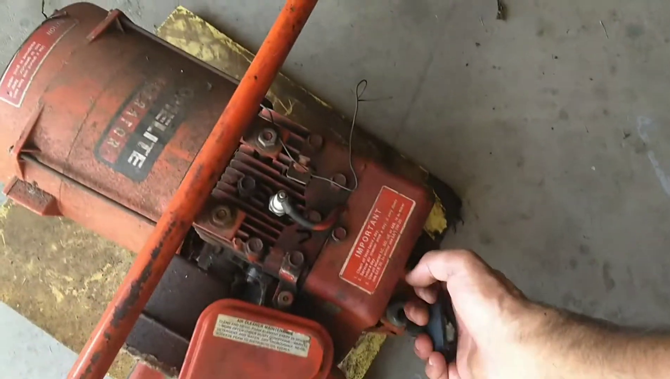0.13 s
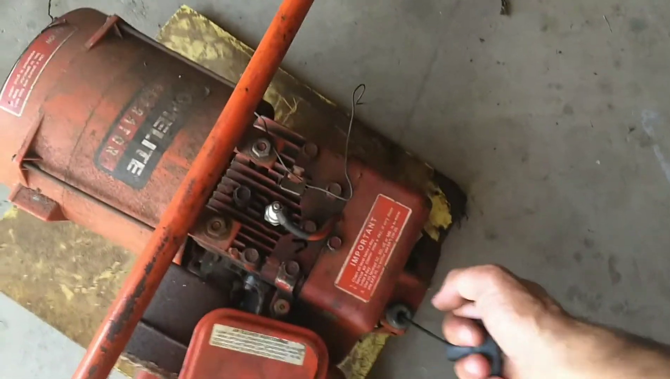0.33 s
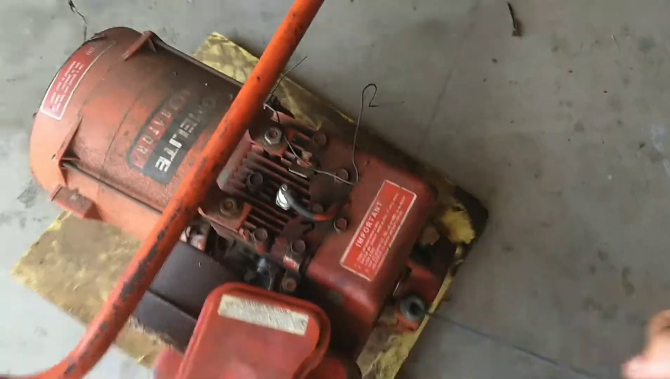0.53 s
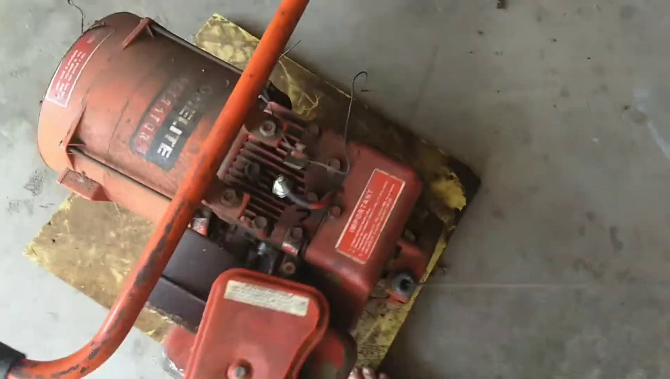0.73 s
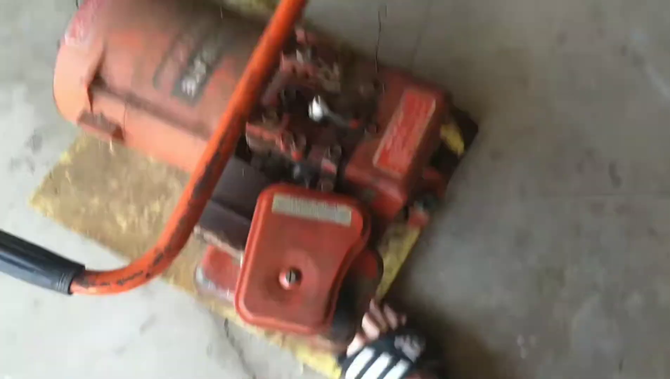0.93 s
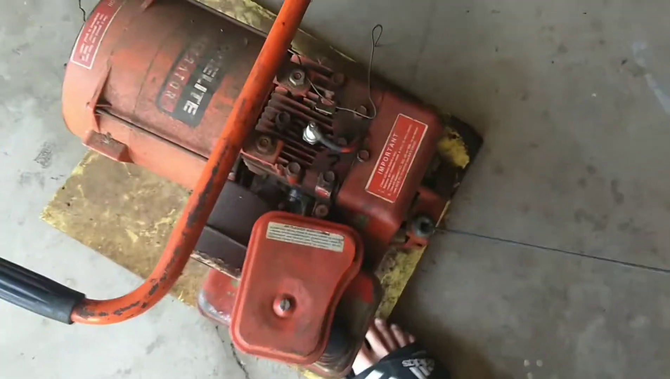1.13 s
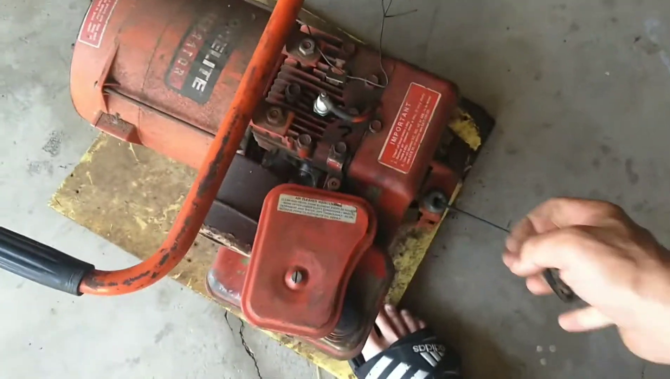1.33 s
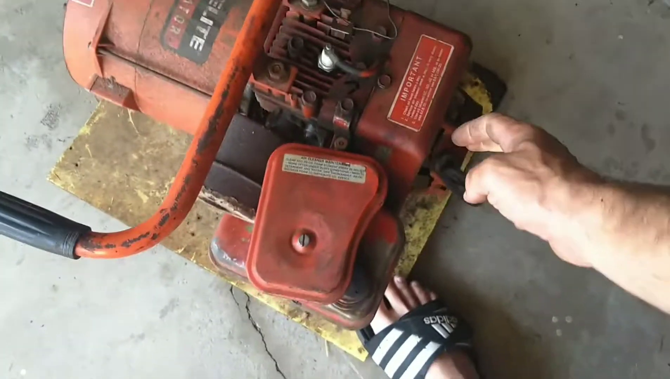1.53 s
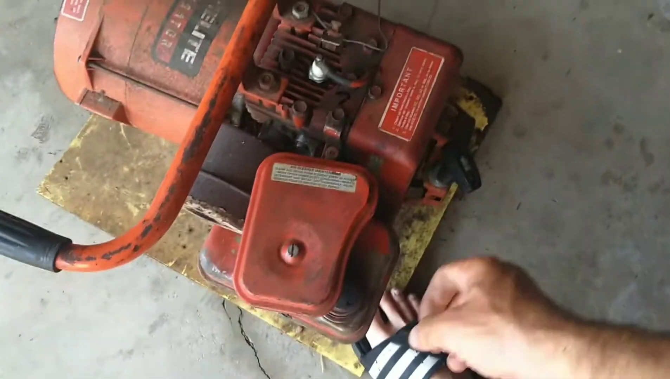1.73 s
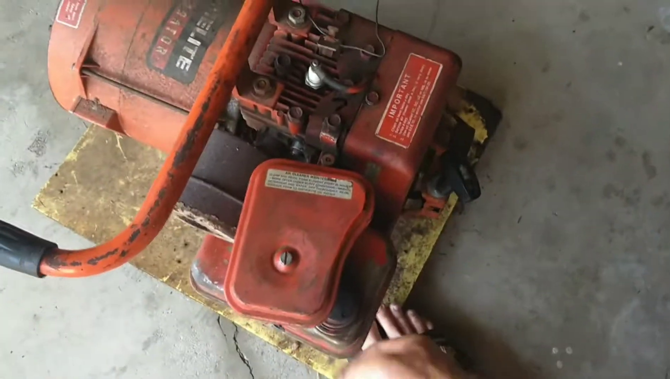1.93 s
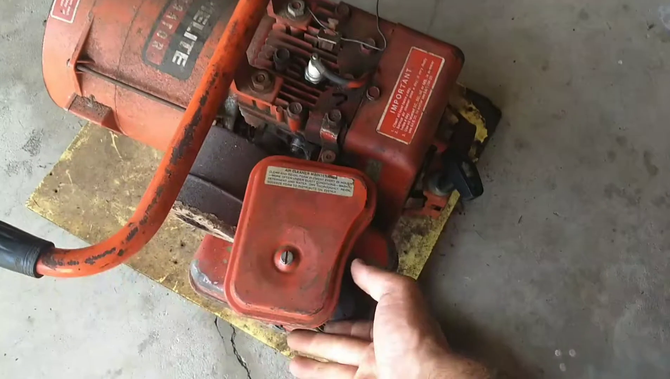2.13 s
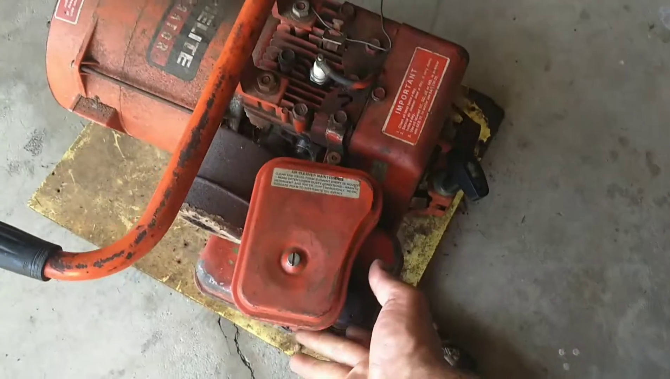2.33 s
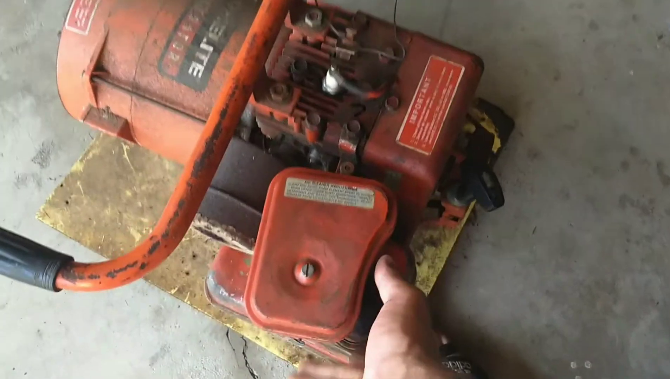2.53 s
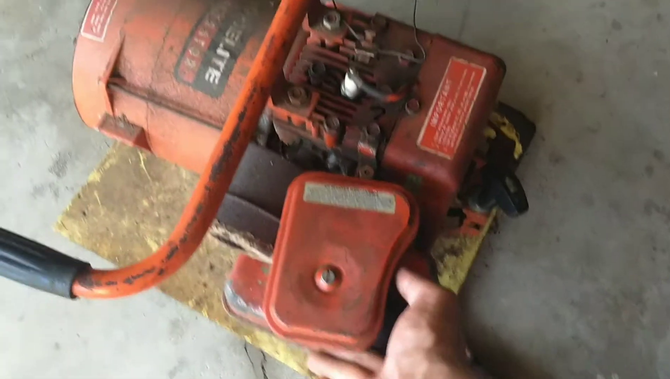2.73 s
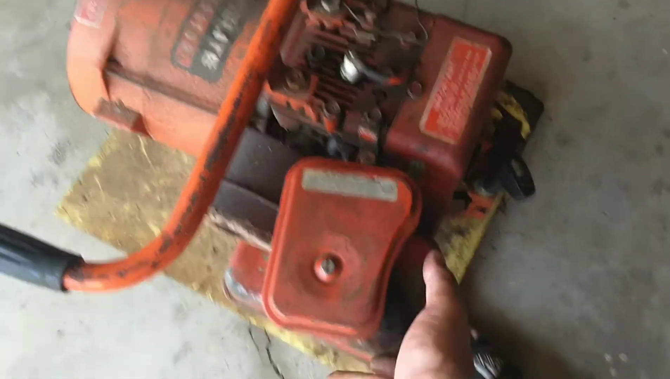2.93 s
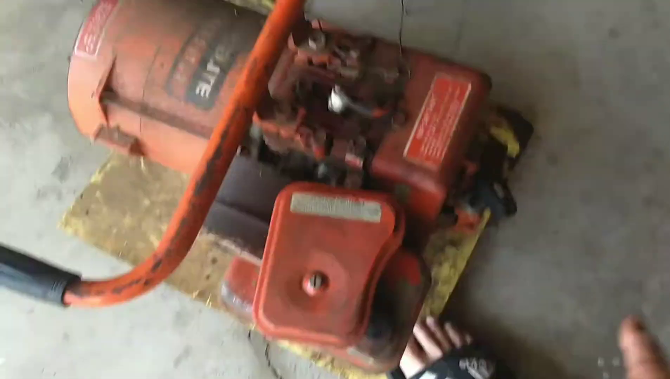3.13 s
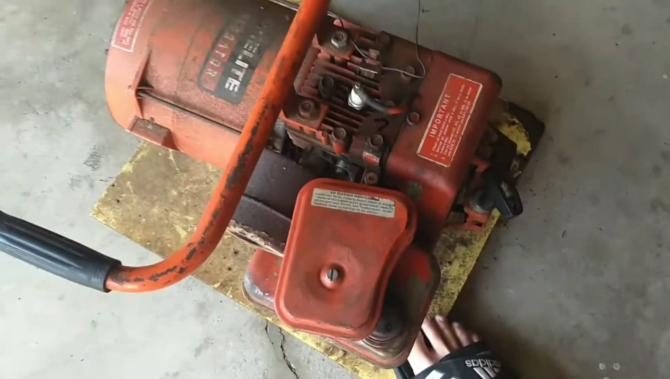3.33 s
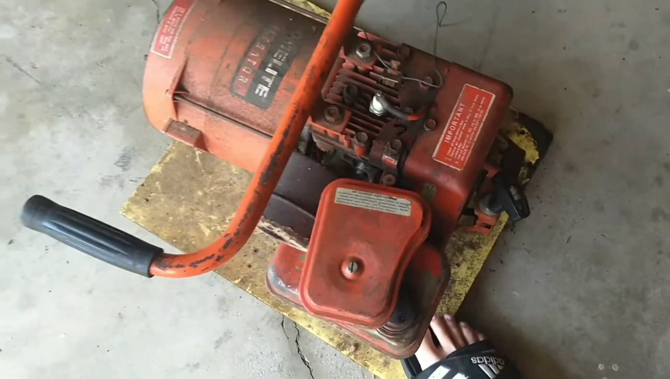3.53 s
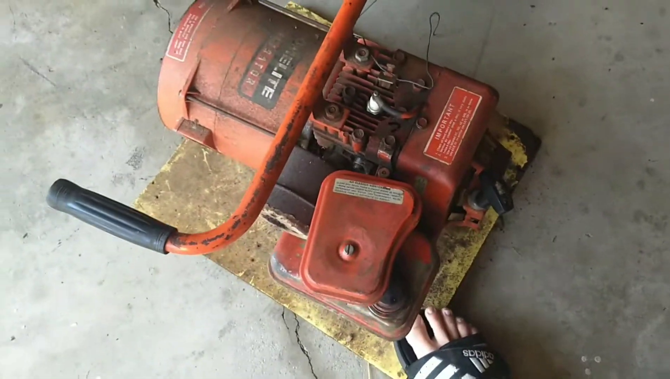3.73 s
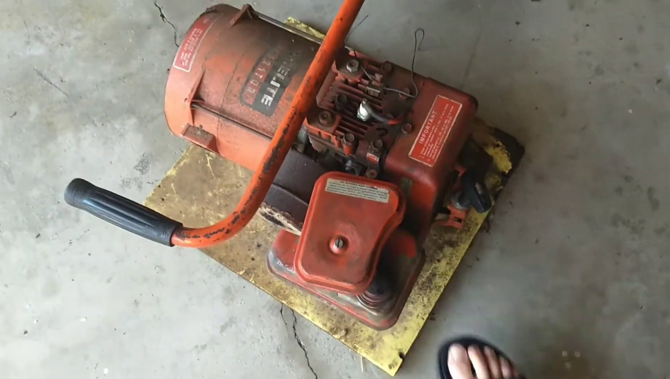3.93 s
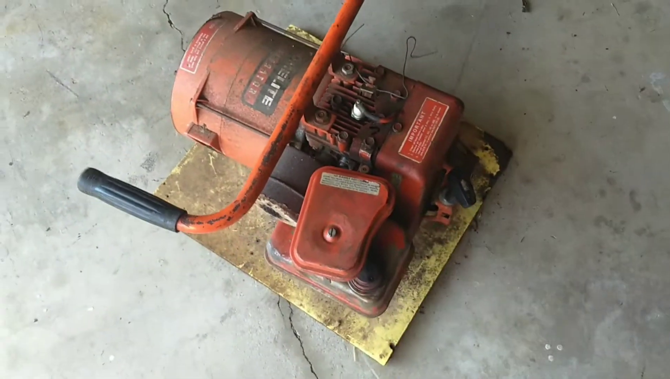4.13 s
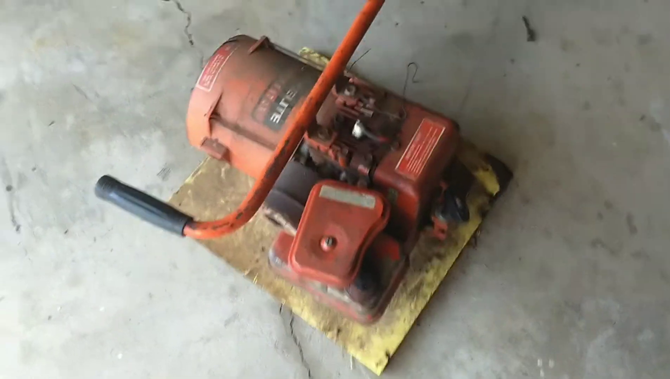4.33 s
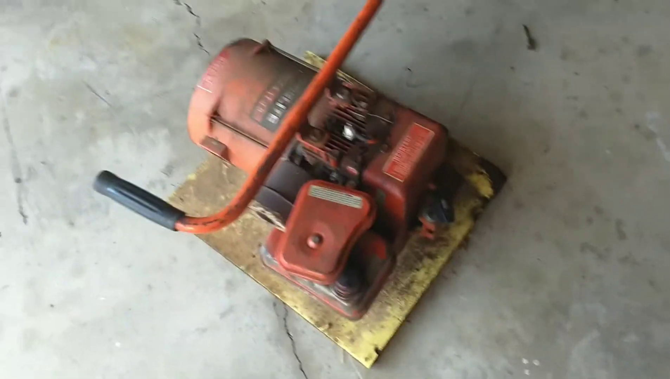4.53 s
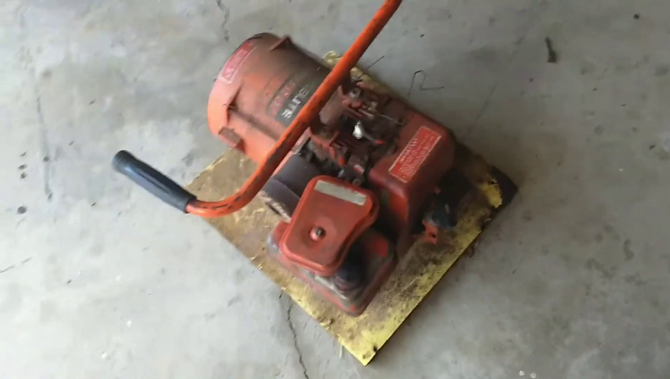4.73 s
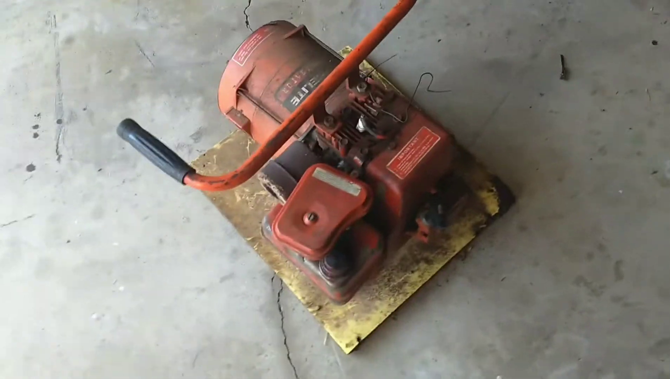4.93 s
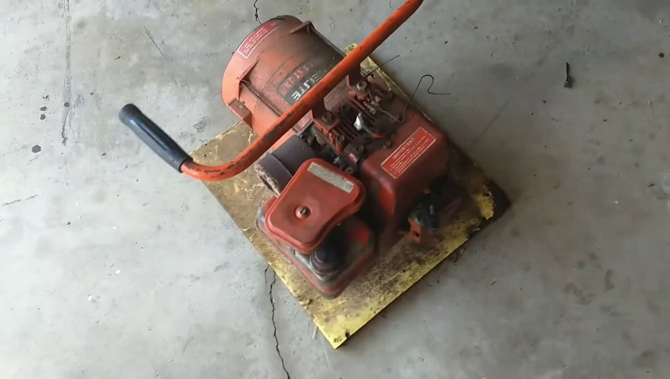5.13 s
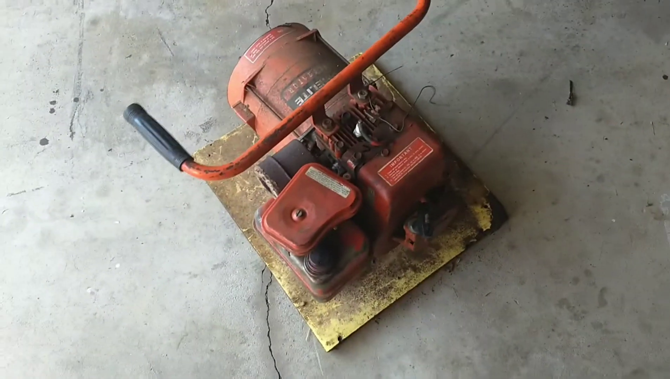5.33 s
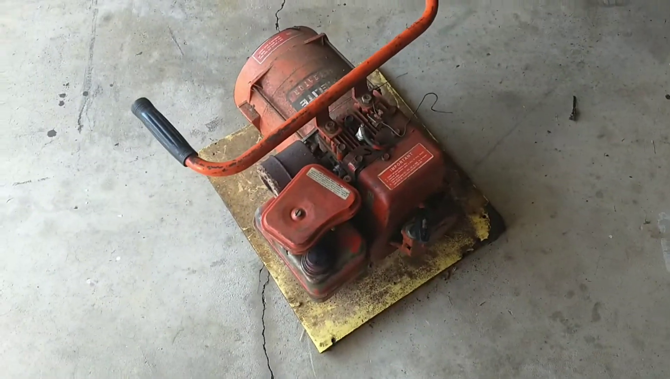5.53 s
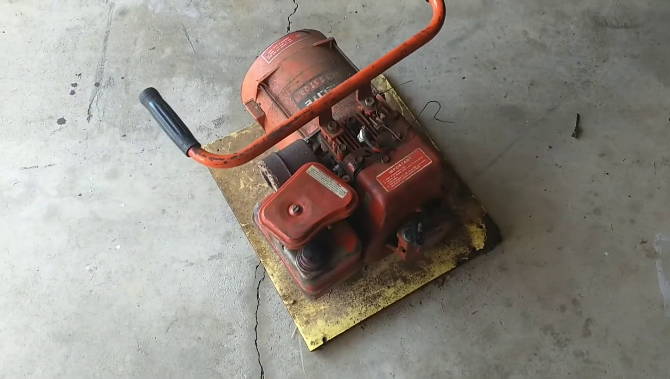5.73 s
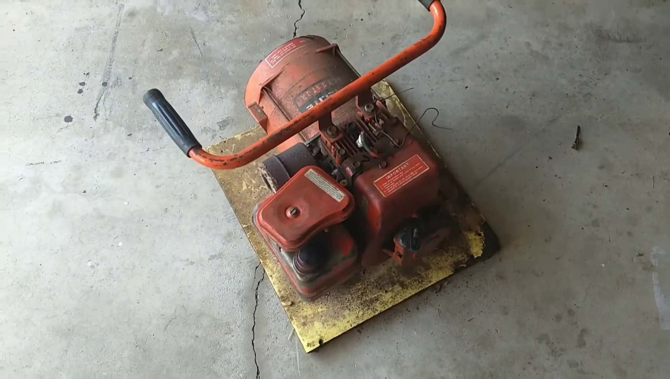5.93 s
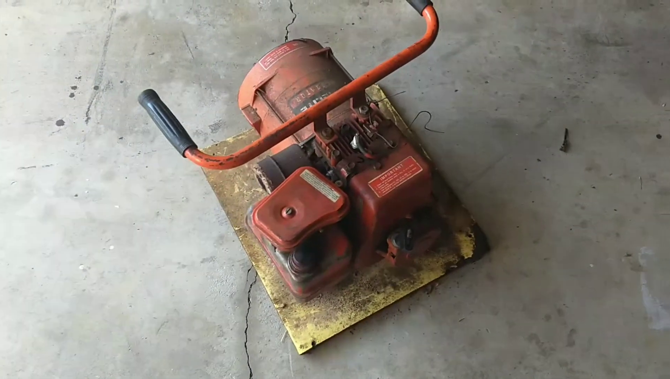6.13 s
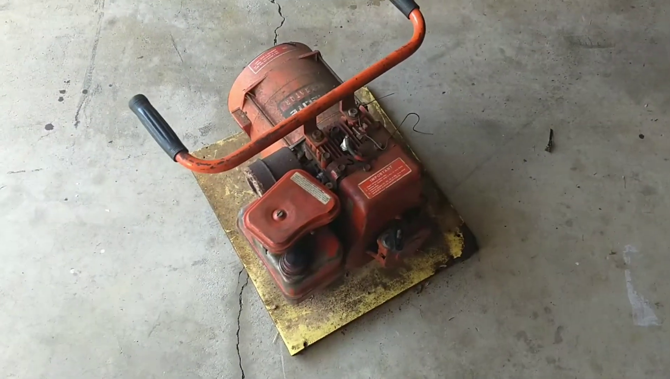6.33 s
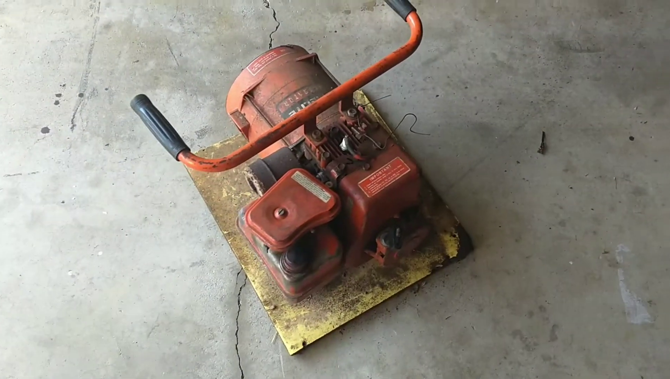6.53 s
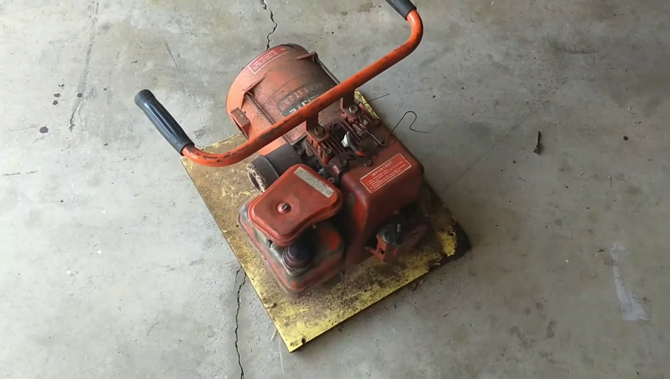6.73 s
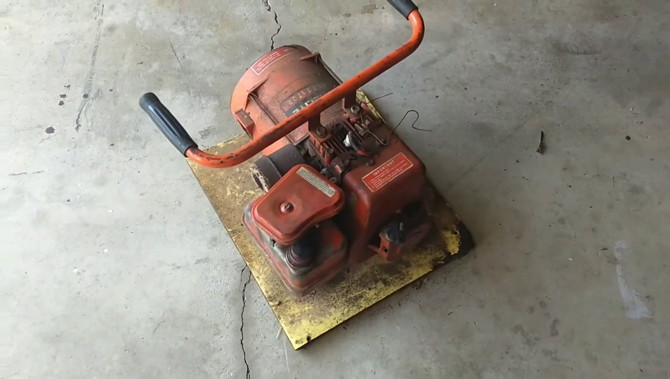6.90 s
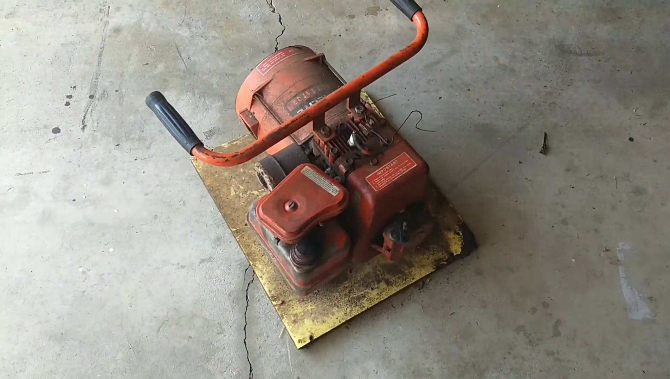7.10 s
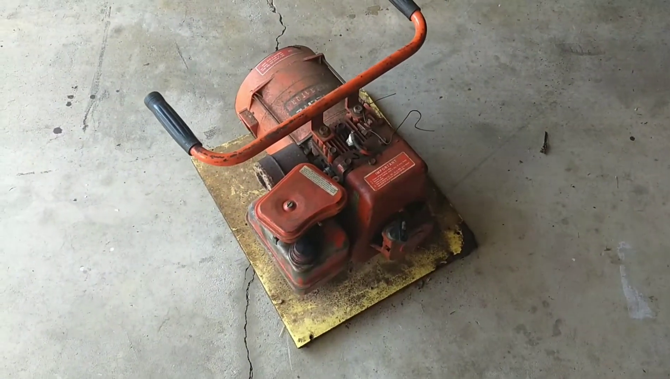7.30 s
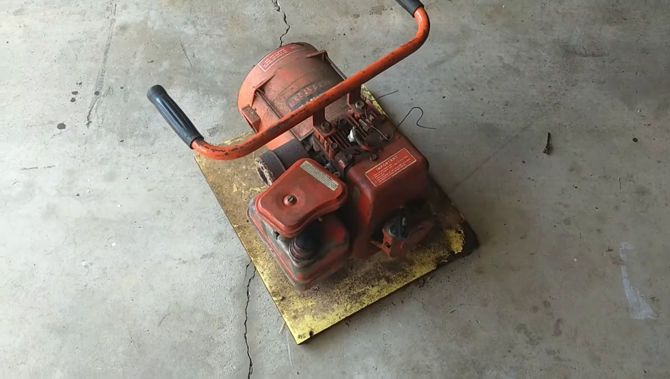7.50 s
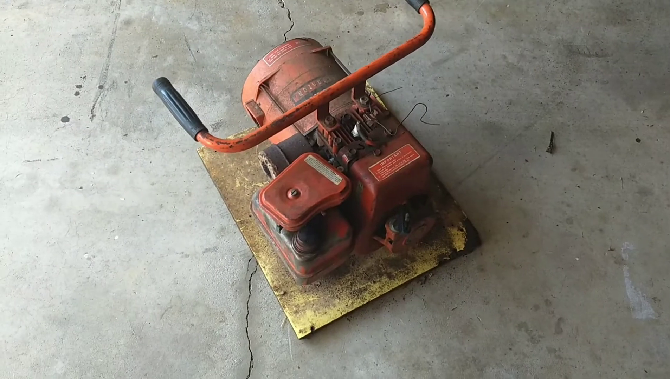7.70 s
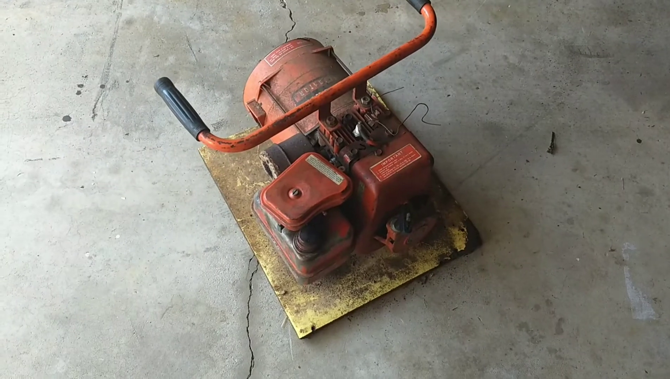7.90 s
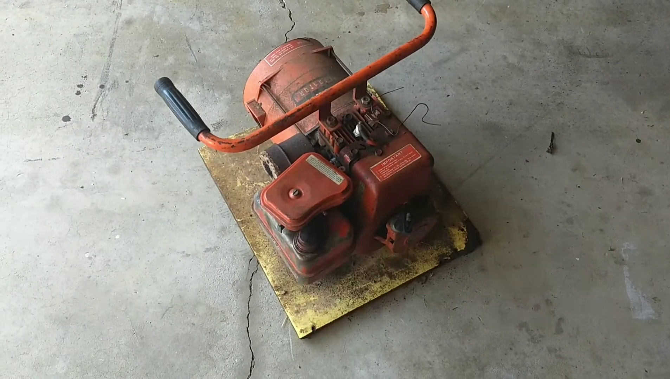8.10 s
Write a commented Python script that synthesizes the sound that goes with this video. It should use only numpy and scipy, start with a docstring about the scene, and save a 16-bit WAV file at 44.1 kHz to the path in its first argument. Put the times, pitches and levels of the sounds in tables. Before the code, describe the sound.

A handheld phone close to an old small generator: light clicks, a scraping pull cord, a loud crack of the frame, and a dull boom from the board. The engine catches in thick uneven puffs, falters, bursts briefly faster, then settles into a dry rapid putter with rattling covers and ticking gears. It keeps running to the end, with one brief doubling of the beat, in a hard garage.

```python
"""A garage: a rope is pulled on a small single-cylinder generator standing on a board; the frame knocks, the engine
catches, stumbles and settles, mostly firing every second cycle. Each firing is a valve snap, a jet of gas (shaped
noise) and a thump (pressure swing). Valve gear and covers clatter once a cycle, as resonances struck by impulses.
Scraping grains make the rope starter, gliding tones the groans of board and casing.
A handheld phone forms left and right from two microphone ports."""
import sys
import numpy as np
from scipy import signal
from scipy.fft import rfft, irfft
from scipy.io import wavfile
from scipy.ndimage import uniform_filter1d

SR = 44100
rng = np.random.default_rng(int(sys.argv[2]) if len(sys.argv) > 2 else 0)


def wav_record(signal):
    """Record a signal, one row per channel, as 16-bit PCM in the file named by sys.argv[1]."""
    frames = np.transpose(np.atleast_2d(signal))
    bounded = np.clip(frames, -1, 1)
    # unit amplitude maps onto the largest positive 16-bit level
    quanta = np.round(bounded * 32767).astype(np.int16)
    wavfile.write(sys.argv[1], SR, quanta)


N = 364266


def undb(db):
    """Decibels to gain."""
    return 10 ** (np.asarray(db) / 20)


def unit(x):
    """Scale to rms 1."""
    return x / np.sqrt(np.mean(x ** 2, axis=-1, keepdims=True))


def noise():
    """Two unrelated noises, one for each port."""
    return rng.standard_normal((2, N))


def curves(table):
    """Columns of a table after the time column, one value per sample."""
    s, *columns = np.transpose(table)
    return [np.interp(np.arange(N) / SR, s, c) for c in columns]


def band(x, hz, width_hz):
    """Two-pole resonance, gain 1 at the centre."""
    return signal.lfilter(*signal.iirpeak(hz, hz / width_hz, SR), x)


def body(x, modes):
    """Sum of resonances with alternating signs."""
    return sum((-1) ** k * undb(db) * band(x, hz, width_hz) for k, (hz, width_hz, db) in enumerate(modes))


def ring(x, hz, t60_s):
    """Decaying mode, peak 1 for a unit impulse."""
    pole = np.exp(2j * np.pi * hz / SR - np.log(1000) / (t60_s * SR))
    return signal.lfilter([1], [1, -pole], x).imag


def clicks(s, gain):
    """Impulses at the given times."""
    at = np.round(np.asarray(s) * SR).astype(int)
    ok = (at >= 0) & (at < N)
    return np.bincount(at[ok], (gain * np.ones(len(at)))[ok], N)


def spread(x, shape):
    """Give every impulse this shape."""
    return signal.fftconvolve(x, shape)[:N]


def hump(rise_s, fall_s):
    """Smooth pulse, peak 1."""
    t = np.arange(int(8 * fall_s * SR)) / SR
    shape = (1 - np.exp(-t / rise_s)) ** 2 * np.exp(-(t / fall_s) ** 2)
    return shape / shape.max()


# Spells of firing on every cycle, else on every second. Each row: start in seconds, end in seconds.
EVERY_CYCLE = [(.7, 1.44), (2.0, 2.14), (3.12, 3.41), (7.49, 7.81)]


def eager(s):
    """True where every cycle fires."""
    return np.any([(a < s) & (s < b) for a, b in EVERY_CYCLE], axis=0)


GOVERNED_CYCLE_S = .04977
TWO_MISSES_S = 4.1  # here two cycles in a row fail to fire


def cycles(s):
    """Start and length of every cycle, and whether it fires."""
    two_misses = (s[:-1] < TWO_MISSES_S) & (s[1:] > TWO_MISSES_S)
    cycles_between = 2 - eager((s[1:] + s[:-1]) / 2) + two_misses
    count = np.r_[0, np.cumsum(cycles_between)]
    start = np.interp(np.arange(count[-1] + 1), count, s)
    return start[:-1], np.diff(start), np.isin(np.arange(count[-1]), count)


def swing(s, gain, span_s, tilt):
    """Pressure dips, peaks and dips again over the span of the exhaust stroke."""
    u = np.arange(int(span_s * SR)) / (span_s * SR)
    pressure = -np.sin(3 * np.pi * u) * np.sin(np.pi * u) ** 1.54 * (u + 0.32) ** tilt
    return clicks(s + u * span_s, gain * pressure)


THUMP_LATE_S, THUMP_SLOW_LEAD_S = .0014, .0018  # delay after the firing, shortened on a slow crank
# Firings, uneven while the engine catches and stumbles, then settling; the last only ends the last cycle.
# Each row: time in seconds, then relative levels of gas jet, thump and snap in dB.
FIRINGS = [(0.7383, -45, -14.5, -4), (0.9303, -23, -13, -2.5), (1.06, -16, -11, -3), (1.1644, -17, -9, 4),
           (1.2584, -18, -10, 2.5), (1.3467, -20, -11.5, -2), (1.4357, -21, -13, -3), (1.621, -19, -13, -8),
           (1.808, -31, -18.5, -9.5), (2.019, -31, -19, -18), (2.1353, -19.5, -12, -0.5),
           (2.3801, -19, -15, -5), (2.6386, -20.5, -12.5, -5.5), (2.9003, -19, -14, -0.5),
           (3.123, -19.5, -12, -1), (3.217, -20, -15, -6), (3.3103, -19, -15, -4),
           (3.4041, -22.5, -15, -22), (3.584, -20.5, -15, -4), (3.7454, -21.5, -18, -3.5),
           (3.9, -21, -20, -7), (4.046, -18.5, -18, -4.5), (4.2577, -20, -19.5, -5), (4.3909, -19, -22, -7),
           (4.5251, -21, -22, -10), (4.6558, -19, -18, -4.5), (4.7805, -19.5, -18.5, -3),
           (4.8978, -19, -20.5, -17), (5.018, -21.5, -22, -7), (5.1317, -23.5, -24, -10),
           (5.2455, -19, -20.5, -10), (5.3552, -22.5, -21.5, -5), (5.4625, -21.5, -20.5, -11),
           (5.5702, -17.5, -22, -9), (5.6765, -19, -21, -3.5), (5.7793, -21, -20.5, -2.5),
           (5.883, -17, -19, -3.5), (5.9868, -19.5, -20, -20), (6.0926, -18, -20, -11),
           (6.1938, -20, -23, -3.5), (6.2981, -22, -25, -10), (6.3994, -19, -20.5, -5),
           (6.5006, -20.5, -19, -9), (6.6019, -18, -18.5, -5), (6.7037, -18.5, -20, -17),
           (6.8044, -18.5, -18.5, -11), (6.9042, -19.5, -19, -3), (7.004, -18, -20.5, -9),
           (7.1028, -21, -21, -11), (7.203, -20.5, -21, -17), (7.3023, -23.5, -20.5, -23),
           (7.4026, -20.5, -19, -6), (7.5018, -19.5, -20, -11), (7.5512, -21.5, -21, -12),
           (7.6006, -19, -23, -9), (7.651, -19.5, -20, -18), (7.7014, -21, -22, -17),
           (7.7528, -23.5, -21, -25), (7.8042, -21, -19.5, -11), (7.9044, -21, -18, -6),
           (8.0037, -18.5, -21, -5), (8.1015, -23.5, -22, -7), (8.2033, -24.5, -19, -11),
           (8.303, -21, -21, -11)]
# Silencer, ringing on after each thump. Each row: centre in Hz, width in Hz, level in dB.
SILENCER = [(121, 7.7, -5.5), (187, 11, -18.5)]
# Gas jet colour. Each row: centre in Hz, width in Hz, relative level in dB.
JET = [(2220, 8470, 3), (5110, 6460, 8.5), (6680, 3870, 8), (11400, 6200, 1.5), (14460, 7150, 0)]


def exhaust(s, jet_db, thump_db, snap_db):
    """The valve cracks open, hot gas jets out, the silencer thumps; a misfire only puffs."""
    start, length, fired = cycles(s)
    s, jet_db, thump_db, snap_db = s[:-1], jet_db[:-1], thump_db[:-1], snap_db[:-1]
    misfires = start[~fired]

    t = np.arange(-200, 200) / SR
    spike = (1 - 1.45 * t / 0.000098) * np.exp(-.5 * (t / 0.000092) ** 2)
    recoil = 0.34 * np.exp(-.5 * ((t - .0008) / 0.0018) ** 2)
    snap = spread(clicks(s - .0022 + t[0], undb(snap_db)), spike - recoil)
    late_snap = band(np.roll(snap, 40), 650, 500)

    # a slow crank holds the valve open longer, so jet and thump last longer
    slow = np.clip((length[fired] - .05) / 0.041, 0, 1)
    jet = spread(clicks(s - .0008, undb(jet_db) * slow), hump(.0008, .0085))
    jet += spread(clicks(s - .0008, undb(jet_db) * (1 - slow)), hump(.0004, .0055))
    jet += spread(clicks(misfires - .003, undb(-74.0)), hump(0.0055, 0.014))

    thump = np.zeros(N)
    for at, db, k in zip(s, thump_db, slow):
        late_s = THUMP_LATE_S - THUMP_SLOW_LEAD_S * k
        thump += swing(at + late_s, undb(db), 0.01194 + 0.001 * k, 4.3 * k - .3)
    puff_db = -34 + 70 * length[~fired] + 2 * rng.standard_normal(np.sum(~fired))
    for at, db in zip(misfires, puff_db):
        thump += swing(at - .002, undb(db), 0.011, -0.85)
    ringing = sum(undb(db) * band(thump, hz, width_hz) for hz, width_hz, db in SILENCER)

    pops = 0.2 * snap + undb(-3.0) * late_snap + thump + ringing
    return pops, jet * unit(body(noise(), JET))


def gear_ticks(start, length):
    """Ticks at the same 26 places of every cycle, with jitter in time and size."""
    count = 26
    place = rng.random(count)
    size = undb(2.15 * rng.exponential(size=count)) * rng.choice([-1, 1], count)
    jitter_s = 0.00032 * rng.standard_normal((len(start), count))
    when = start[:, None] + length[:, None] * place + jitter_s
    gain = size * undb(5.1 * rng.standard_normal(when.shape))
    return unit(clicks(when.ravel(), gain.ravel()))


SEAT_SCATTER_DB = 2.5
MISFIRE_SEAT_DB = 1  # the valve seats harder on a cycle that did not fire


def valve_seats(start, length, fired):
    """A valve drops on its seat a good quarter of the way through each cycle, a fainter one later."""
    scatter_db = SEAT_SCATTER_DB * rng.standard_normal(len(start))
    seat_db = scatter_db - 13.5 * length + 2.5 + MISFIRE_SEAT_DB * ~fired
    first = clicks(start + .275 * length - .0002, undb(seat_db))
    return first + clicks(start + 0.91 * length, undb(-9.5))


# Gains over the clatter at governed speed, and their fall per Hz of cycle rate below it.
AIR_DB, AIR_DB_PER_HZ = -1, 0.75
SHROUD_DB, SHROUD_DB_PER_HZ = -11, -0.4  # the shroud sings less as the speed rises
TAP_DB, TAP_DB_PER_HZ = 41, .95
# Clatter, after a fading rattle at the start.
# Each row: time in seconds, clatter level in dB, relative frame hum level in dB.
RUNNING = [(0.0, -34.5, -47.5), (0.32, -85, -55), (0.46, -32, -42), (0.53, -34, -30.5), (0.68, -35, -44),
           (0.83, -35, -35), (0.94, -26.5, -41), (1.1, -27.5, -31), (1.45, -34.5, -46.5),
           (1.7, -33.5, -37.5), (2.0, -29.5, -44.5), (2.4, -34.5, -47), (2.8, -34.5, -39.5),
           (3.2, -32.5, -39), (3.95, -37, -38.5), (4.95, -38, -39.5), (5.7, -36, -36.5),
           (8.26, -35.5, -37.5)]
# Resonances of covers and gears, humming frame, cooling air and tappets.
# Each row: centre in Hz, width in Hz, relative level in dB.
COVERS = [(872, 164, -2), (1144, 227, -1.5), (1510, 52, -1), (1695.4, 34.4, 10), (1690, 274, 1),
          (3110, 1550, -12)]
HUM = [(179, 63, -3.5), (297, 110, -4), (392.4, 66, -2), (491, 30, -3.5), (555, 130, -7.5)]
AIR = [(3590, 3100, 9.5), (4950, 1560, 13.5), (6600, 740, 10.5), (7930, 3300, 5.5), (13000, 12300, -6.5)]
TAPPET = [(715, 820, -3.5), (1640, 1520, -5.5), (4510, 350, 2.5), (7200, 3900, -14)]
# Singing fan shroud: centre in Hz, width in Hz.
SHROUD = (638, 51)


def clatter(s):
    """Gears, tappets and loose covers tick in the same order every cycle, over cooling air."""
    covers_db, hum_db = curves(RUNNING)
    start, length, fired = cycles(s)
    t = np.arange(N) / SR
    slower_hz = 1 / GOVERNED_CYCLE_S - np.interp(t, start, 1 / length)
    air_db = covers_db + AIR_DB - AIR_DB_PER_HZ * slower_hz
    before_pull = t < STARTER[0][0]
    shroud_db = covers_db + SHROUD_DB - SHROUD_DB_PER_HZ * slower_hz - 20 * before_pull
    tap_db = covers_db + TAP_DB - TAP_DB_PER_HZ * slower_hz

    ticks = gear_ticks(start, length)
    seat = valve_seats(start, length, fired)
    jolts = unit(seat)

    steady = undb(covers_db) * unit(body(1.6 * ticks + noise(), COVERS))
    steady += undb(air_db) * unit(body(0.043 * ticks + noise(), AIR))
    steady += undb(shroud_db) * unit(band(0.79 * jolts + 0.59 * ticks + noise(), *SHROUD))
    # the same jolts shake the frame, and a thin panel whines
    steady += undb(hum_db - 3.5) * unit(body(0.28 * jolts + 0.83 * ticks + noise(), HUM))
    steady += undb(hum_db - 4) * unit(band(noise(), 1890, 60))
    rattle = spread(seat, hump(.0005, .0065))
    steady += undb(covers_db + 8) * rattle * unit(body(noise(), TAPPET))

    tap = -undb(tap_db) * band(band(seat, 1000, 1600), 760, 2200)
    tap += undb(covers_db + 38.5) * band(band(seat, 146, 120), 135, 200)
    return tap + drone(start, length, hum_db), steady


FLYWHEEL_S = .35  # the shaft speed evens out over this time
# Rotor and fan drone. Each row: multiple of the cycle rate, relative level in dB.
ORDERS_DB = [(6, -9), (9, -11), (10, -4.5), (12, -9), (14, -11), (18, -10), (19, -10), (20, -13), (21, -5),
             (24, -9), (25, -12), (27, -10), (28, -7), (29, -12), (31, -11), (34, -10), (37, -11)]


def drone(start, length, db):
    """Clean tones locked to the shaft, growing with speed and wavering slowly."""
    t = np.arange(N) / SR
    cycle_s = np.interp(t, start + length / 2, length)
    cycle_s = uniform_filter1d(cycle_s, int(FLYWHEEL_S * SR), mode="nearest")
    turn = np.cumsum(1 / cycle_s) / SR
    speed_db = -260 * (cycle_s - GOVERNED_CYCLE_S)
    tones = np.zeros(N)
    for order, order_db in ORDERS_DB:
        waver_db = np.interp(t, np.arange(70) / 7, 2.0 * rng.standard_normal(70))
        tones += undb(order_db + waver_db) * np.sin(2 * np.pi * (order * turn + rng.random()))
    return undb(db + speed_db) * tones


GRAIN_CAP = 2.5  # no scraping grain stands far above the rest
# Rope, pawls and rewind spring scraping, out then back.
# Each row: time in seconds, level in dB, brightness in dB.
STARTER = [(0.25, -51, -4), (.3, -42.5, 0.5), (0.46, -27.5, -7.5), (0.55, -32, 8.5), (0.62, -24.5, -7),
           (0.7, -39, 5.5), (0.79, -28.5, -29), (0.85, -43, -28), (1.046, -24, -0.5), (1.25, -30.5, -2),
           (1.35, -62, -10.1)]
# Thin squeals. Each row: start in seconds, end in seconds, pitch in Hz, level in dB.
SQUEAKS = [(0.068, 0.14, 9040, -59), (0.313, 0.345, 5130, -44), (0.53, 0.588, 2710, -34)]


def starter():
    """Uneven scraping grains excite the housing while the rope runs out and rewinds; narrow noise squeals."""
    level_db, bright_db = curves(STARTER)
    t = np.arange(N) / SR
    on = (t > STARTER[0][0]) & (t < STARTER[-1][0])
    size = np.minimum(rng.exponential(size=N // 250 + 1), GRAIN_CAP)
    grains = noise() * undb(3.8 * np.repeat(size, 250)[:N])
    dull = unit(body(grains, [(638, 73, -1), (894, 380, 0), (1085, 460, 1), (1960, 1920, -4.0)]))
    bright = unit(body(grains, [(2660, 390, 6), (5200, 900, -6), (4100, 9200, 24.0), (10000, 2200, 20.5)]))
    out = on * undb(level_db) * (dull + undb(bright_db) * bright)
    for a, b, hz, db in SQUEAKS:
        fade = np.interp(t, [a - .004, a, b, b + 0.011], [0, 1, 1, 0])
        out += undb(db) * fade * unit(band(band(noise(), hz, 160), hz, 200))
    return out


CRACK_DB = 11.5  # the crack stands this far over the blow that rings the frame
# Knocks of handle, frame and lever. Each row: time in seconds, relative level in dB, contact pitch in Hz,
# ring in dB over that level, grit in dB against the clean impact.
KNOCKS = [(0.213, -50.5, 2820, -7, -17), (0.286, -36.5, 5100, -28, -18), (.328, -33, 3100, -26, -19),
          (.342, -37, 6750, -14, -19), (.411, -40, 5000, -25, -19), (.451, -22.5, 3300, -26, -20),
          (.453, -27.5, 1400, -24, -8), (.505, -38, 245, -25, -23), (.527, -27, 1500, -13, -8),
          (.533, -25, 1500, -11, -10), (0.608, -11, 3400, -21, -31), (.6105, -28, 950, -20, -20),
          (.6285, -14.5, 860, -21, -23.5), (.632, -20, 900, -15, -26), (.644, -26, 1200, -32, -26),
          (0.649, -13, 465, -40, -29.5), (.653, -26, 690, -27, -30), (.670, -39, 443, -32, -20),
          (.761, -14.5, 780, -38, -28), (.761, -33, 3240, -34, -11), (.789, -24, 500, -22, -19),
          (0.7925, -18.5, 637, -26, -23), (.8, -25, 1410, -22, -14), (.969, -34, 2500, -3.5, -21),
          (1.032, -20, 2370, -9.5, -10), (1.636, -25.5, 1500, -3.5, -12), (1.639, -19, 760, -6, -18),
          (1.652, -23, 1500, -18, -12), (1.664, -31, 710, -19, -24), (1.7145, -31, 800, -27, -25),
          (2.358, -31.5, 1390, -9, -20), (2.542, -30, 4350, -33, -19), (2.675, -27, 1510, -13, -16),
          (2.739, -29.5, 1490, -9, -16), (2.791, -33, 3500, -30, -14), (2.803, -26.5, 1500, -33, -2),
          (2.817, -20, 3360, -35, -10), (2.819, -21, 1060, -27, -17), (2.833, -31, 1400, -30, -13),
          (2.973, -27, 1410, -13, -20), (3.04, -33, 2960, -24, -19), (4.896, -19, 980, -41, -23.5)]
# Frame modes. Each row: pitch in Hz, level in dB, t60 in seconds.
FRAME = [(480, -24, .07), (621.4, 0.5, 0.3), (728, 2.5, 0.19), (936, 10.5, 0.069), (1220, -26, .1),
         (1434, 4, 0.13), (1724, -6, 0.07), (2000, 13, 0.063), (3260, -3, 0.03)]
# The board booms under the kick. Each row: time in seconds, level in dB, pitch in Hz, t60 in seconds.
BOOM = [(0.791, -15, 289, 0.067), (0.803, -18, 216, 0.056), (0.811, -16.5, 141, 0.13)]


def knocks():
    """A short crack around the contact pitch; the frame and the board ring on."""
    out, blows = np.zeros(N), np.zeros(N)
    t = np.arange(1500) / SR
    for s, db, hz, ring_db, grit_db in KNOCKS:
        grit = rng.standard_normal(1500)
        impact = signal.unit_impulse(1500) + undb(grit_db) * grit * np.exp(-t / 0.0081)
        crack = band(band(impact, hz, 0.68 * hz), hz, 3.8 * hz)
        at = int(s * SR)
        out[at:at + 1500] += undb(db + CRACK_DB) * crack / np.abs(crack).max()
        blows[at:at + 1500] += undb(db + ring_db) * grit * np.exp(-t / 0.0026) / 9
    out += sum(undb(db) * ring(blows, hz, t60_s) for hz, db, t60_s in FRAME)
    return out + sum(ring(clicks([s], undb(db)), hz, t60_s) for s, db, hz, t60_s in BOOM)


# Board and casing groan as the engine rocks; one curve each.
# Each row of a curve: time in seconds, pitch in Hz, level in dB.
GROANS = [
    [(.81, 214, -23), (.842, 214, -21), (.86, 225, -36), (.915, 239, -32), (.938, 248, -20.5),
     (.962, 246, -34), (.99, 247, -21.5), (1.015, 252, -39), (1.035, 250, -33), (1.055, 247, -37)],
    [(0.95, 617, -40), (0.966, 599, -32.5), (1.038, 589, -39), (1.07, 620.2, -37)],
    [(1.08, 396.9, -42), (1.128, 403, -38), (1.15, 400, -44)],
]


def groan():
    """Gliding tones that fade in and out at the ends of their curves."""
    t, out = np.arange(N) / SR, np.zeros(N)
    for table in GROANS:
        hz, db = curves(table)
        a, b = table[0][0], table[-1][0]
        fade = np.interp(t, [a - .012, a, b, b + .012], [0, 1, 1, 0])
        out += fade * undb(db) * np.sqrt(2) * np.sin(2 * np.pi * np.cumsum(hz) / SR)
    return out


def garage_hiss():
    """Faint steady hiss of the garage: broad noise."""
    return undb(-58.5) * unit(band(noise(), 1500, 9000))


def tail(t60_s):
    """Noise that dies away, duller with time; energy 1."""
    t = np.arange(int(t60_s * SR)) / SR
    n = rng.standard_normal(len(t))
    dull = band(n, 580, 4200) * np.exp(-np.log(1000) * t / t60_s)
    n = dull + 3.5 * n * np.exp(-np.log(1000) * t / (0.88 * t60_s))
    return n / np.sqrt(np.sum(n ** 2))


def air_rumble():
    """Air moving at each port: low noise."""
    return undb(-60.5) * unit(band(noise(), 89, 77))


PORT_LAG, SOURCE_LAG = 19, 7  # samples: between the ports, and of the sources at the second port
# How the second port hears the scene.
# Each row: frequency in Hz, level in dB, likeness of its noise to the first port's (0-1).
PORT = [(61.3, -1.5, 1), (313, -0.5, 0.91), (620, -4.5, 0.76), (1060, -15.5, 0.9), (1294, -1, 0.2),
        (1760, -11, 0.76), (2610, -1, 0), (2650, -26, 0), (4100, -22.5, 0.02), (7370, -0.5, 0.3),
        (10600, -21.5, 0), (15000, -31, 0.7)]


def second_port(blows, hiss):
    """The shadowed port: filtered blows, and noise scrambled by frequency, all arriving later."""
    hz, db, alike = np.transpose(PORT)
    f = np.log(np.fft.rfftfreq(N, 1 / SR) + 1)
    gain = undb(np.interp(f, np.log(hz), db))
    alike = np.clip(np.interp(f, np.log(hz), alike), 0, 1)
    scrambled = alike * rfft(hiss[0]) + np.sqrt(1 - alike ** 2) * rfft(hiss[1])
    return np.roll(irfft(gain * (rfft(blows) + scrambled), N), SOURCE_LAG)


def scene():
    """Both ports hear the same blows; the noisy sounds and the reverberation differ between them."""
    firings = np.transpose(FIRINGS)
    pops, gas = exhaust(*firings)
    taps, rattle = clatter(firings[0])
    blows = pops + taps + knocks() + groan()
    hiss = gas + rattle + starter() + garage_hiss()
    hiss += [undb(-9.0) * spread(blows + h, np.r_[np.zeros(500), tail(.5)]) for h in hiss]
    return np.array([blows + hiss[0], second_port(blows, hiss)]) + air_rumble()


PORT_CANCEL = .93  # share of the other port taken away
TOP_HZ = 15450


def record(dry):
    """Each channel is one port minus the delayed other; a shelf restores the bass; low and top cut, clipping."""
    other = np.pad(dry[::-1], ((0, 0), (PORT_LAG, 0)))[:, :N]
    pair = undb(-1.5) * (dry - PORT_CANCEL * other)
    pair = signal.lfilter([1, -np.exp(-2 * np.pi * 330 / SR)], [1, -np.exp(-2 * np.pi * 30 / SR)], pair)
    pair = signal.sosfilt(signal.butter(3, 57, "high", fs=SR, output="sos"), pair)
    pair = signal.sosfilt(signal.butter(14, TOP_HZ, fs=SR, output="sos"), pair)
    return np.clip(pair, -1, 1)


dry = scene()
out = record(dry)
wav_record(out)
```